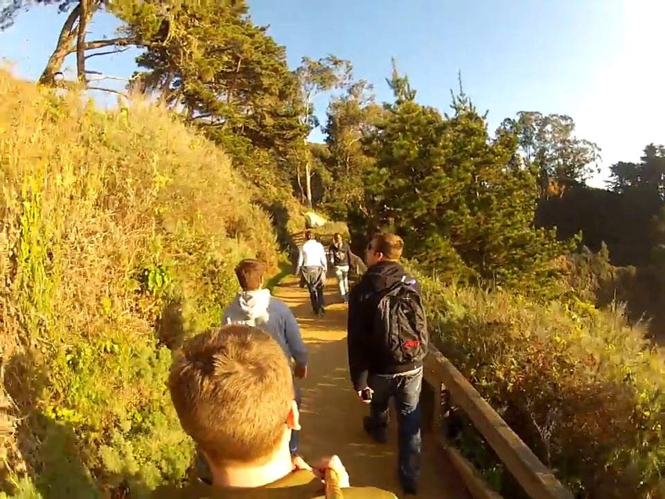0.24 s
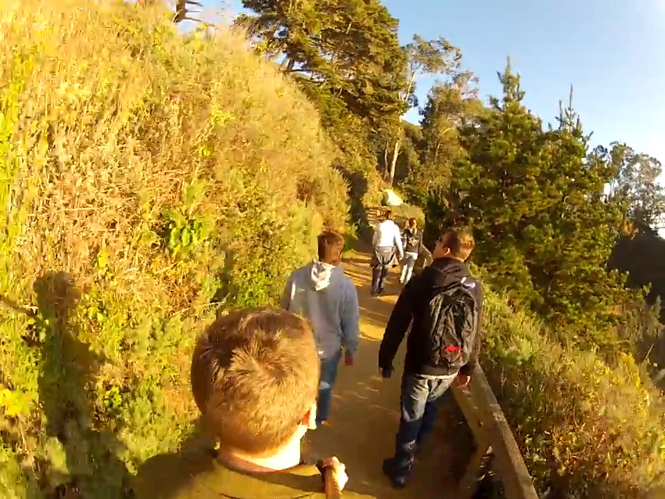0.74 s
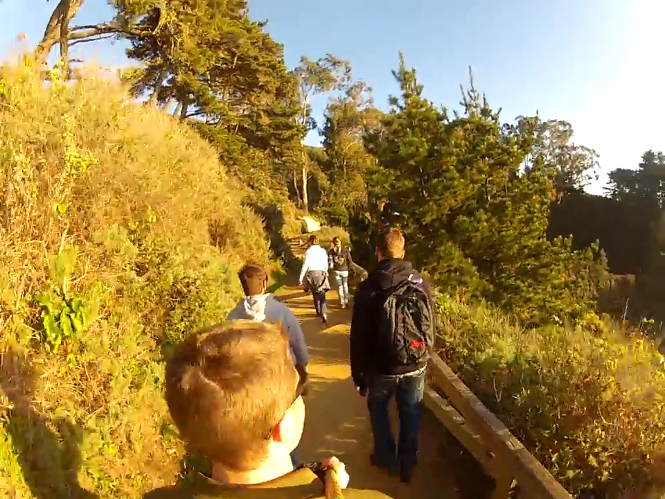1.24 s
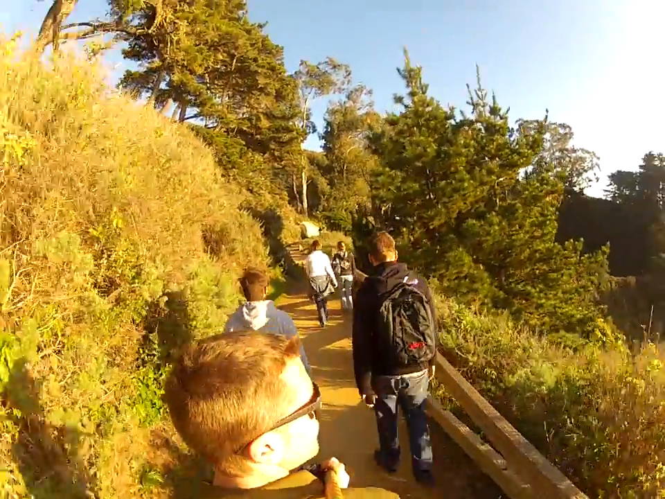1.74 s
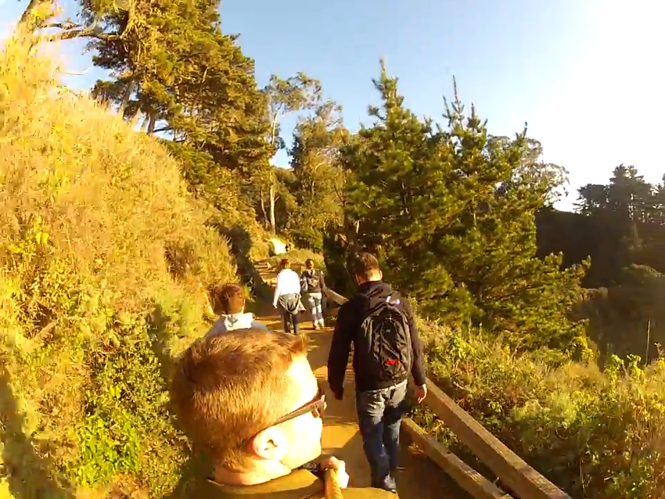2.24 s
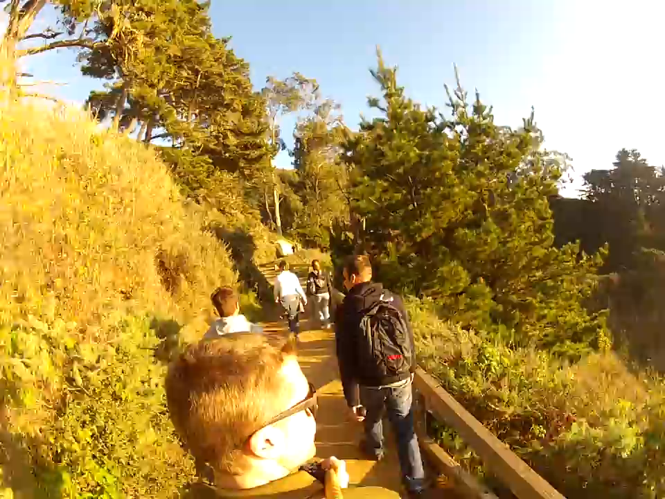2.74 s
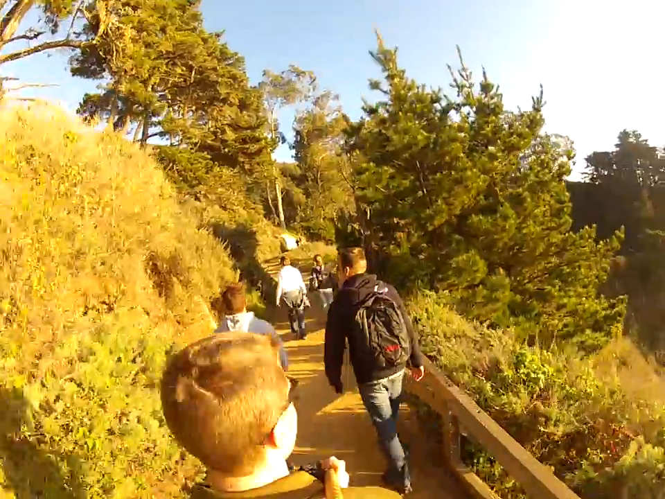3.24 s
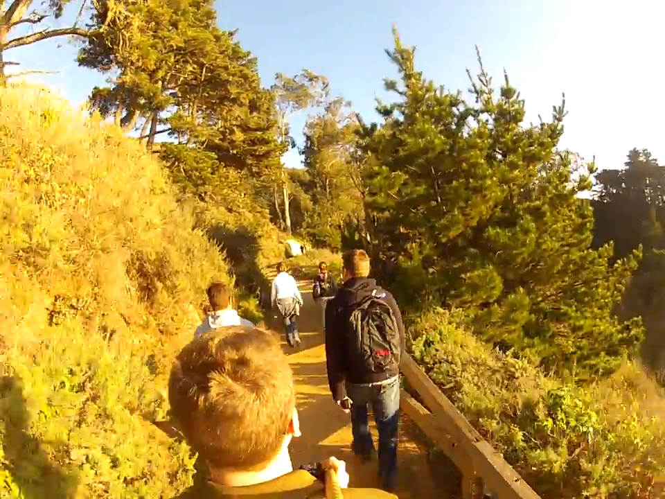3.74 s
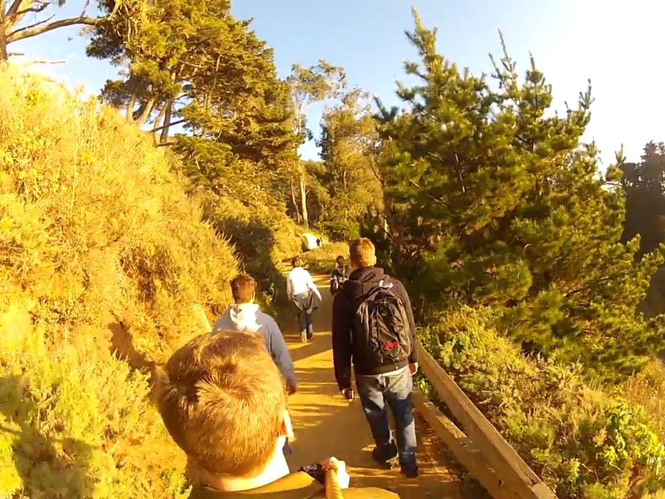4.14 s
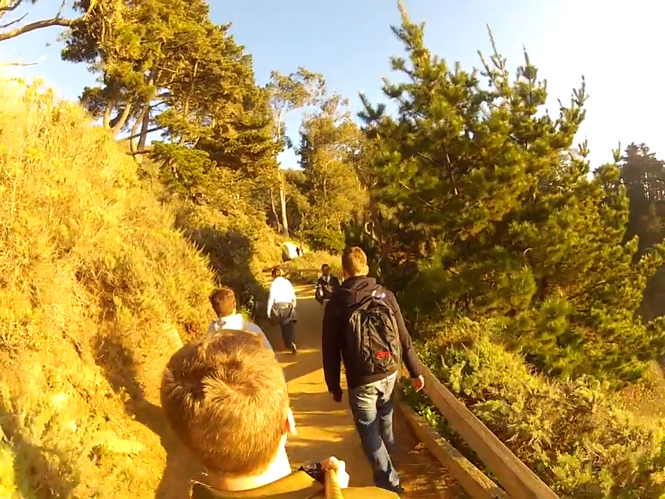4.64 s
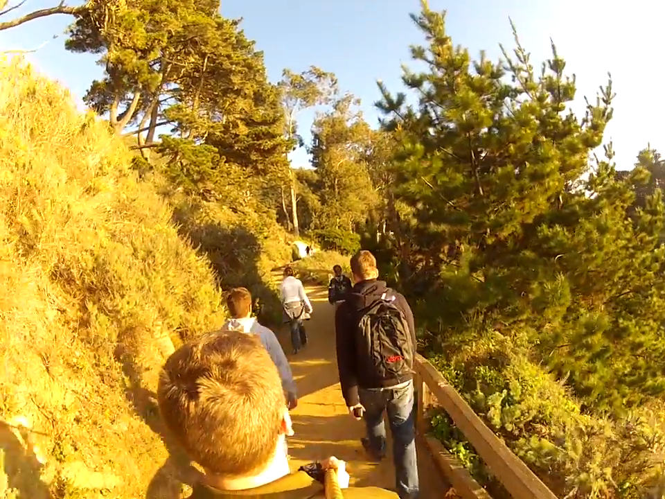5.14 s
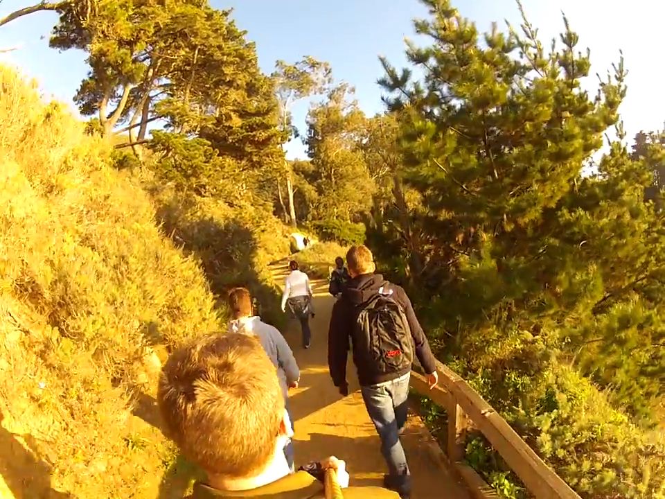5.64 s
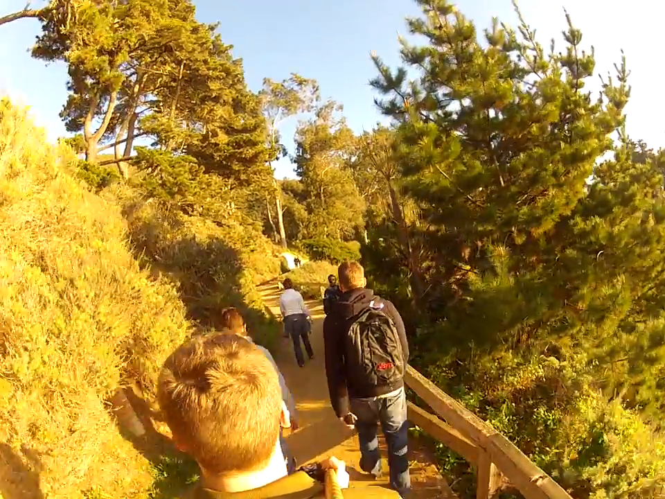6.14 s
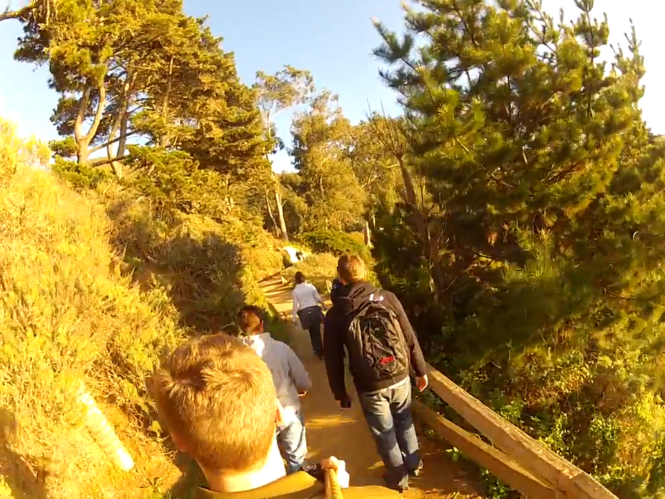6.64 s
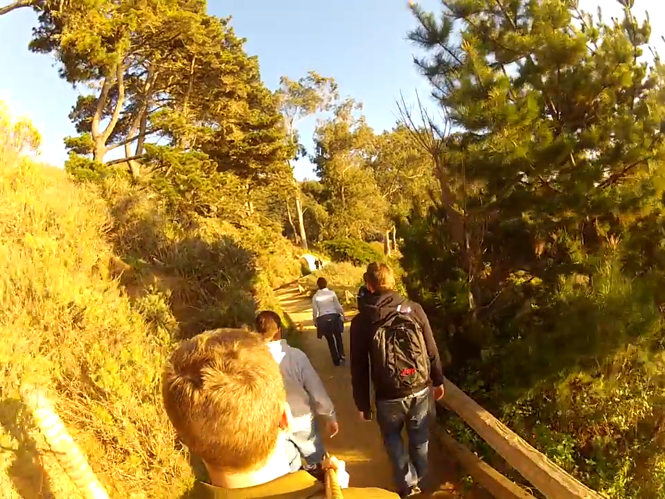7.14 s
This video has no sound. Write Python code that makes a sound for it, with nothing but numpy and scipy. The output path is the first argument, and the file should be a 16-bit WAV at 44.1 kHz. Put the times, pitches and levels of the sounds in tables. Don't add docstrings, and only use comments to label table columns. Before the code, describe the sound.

Heard from inside a small sealed housing on a carried pole: a busy opening of hollow plastic knocks, sharp slams, low palm thumps and dragging grip noise. Hardest blows come just before one second and again near two. After that it drops to quiet, uneven walking jolts, light ticks and gritty rubs at each stride, with a faint muffled hiss. Outdoor trail, but completely dry, lo-fi, with no room.

```python
import sys
import numpy as np
from scipy import signal
from scipy.io import wavfile
from scipy.ndimage import uniform_filter1d

SR = 44100
rng = np.random.default_rng(int(sys.argv[2]) if len(sys.argv) > 2 else 0)


def dump_mix(stems):
    frames = np.atleast_2d(stems).T
    limited = np.clip(frames, -1, 1)
    pcm = np.round(limited * 32767).astype(np.int16)
    wavfile.write(sys.argv[1], SR, pcm)


def voltage_ratio(level):
    return 10 ** (np.asarray(level, float) / 20)


N = 326781

# pitch_hz, width_hz, level_db
POLE_MODES = [(172.7, 67.5, -3.5), (216, 71, 0.5), (262.4, 16.3, 2.5), (350.7, 13.8, -14.5),
              (442, 85, -13.5), (597, 21, -15)]
HOLLOW_MODES = [(477, 44, -11.5), (751, 34.5, 4), (925, 132, 2), (1070, 260, -0.5), (1290, 16, -21)]
SHELL_MODES = [(1600, 78, -3), (1862, 135, -6.5), (2007, 104, -2), (2206, 84, 0.5), (2416, 140, -5.5),
               (2730, 79, -5)]
RIM_MODES = [(3100, 200, -4), (3286, 88, -5), (3584, 240, -1.5)]
# pitch_hz, width_hz, level_db
GRIPPED_POLE_MODES = [(179.4, 44.7, -5.5), (224, 34.7, -4), (255.8, 11.7, 1), (434.5, 13.7, -15),
                      (578.3, 20, -14.5)]
# pitch_hz, width_hz, level_db
KNOCKED_HOLLOW_MODES = [(768, 18, -1), (940, 37, -2), (978, 98, 4), (1205, 74, -5)]
KNOCKED_SHELL_MODES = [(1578, 81, -5), (1907, 76, -1.5), (2181, 73, 3), (2437, 96, -2), (2740, 214, -8.5)]
# pitch_hz, width_hz, level_db
SLAMMED_HOLLOW_MODES = [(438, 30, -4), (581, 32, -5), (750, 40, -14), (965, 60, 5), (1190, 100, -16.5)]
SLAMMED_SHELL_MODES = [(1590, 80, -7), (1950, 127, 1), (2200, 90, -1), (2453, 140, -6), (2670, 100, -11),
                       (2920, 150, -14)]
SLAMMED_RIM_MODES = [(3240, 115, -3), (3534, 110, 1), (3900, 200, -12)]
# pitch_hz, width_hz, level_db
TAPPED_SHELL_MODES = [(1600, 110, -10), (1910, 70, -8), (2165, 85, 1.5), (2385, 100, -1.5), (2700, 70, -11)]

# start_s, level_db, pole_db, hollow_db, contact_s
KNOCKS = [(.0014, -29, -10, -7, 0.011), (.0503, -32.5, 13.5, -7, 0.017), (.1385, -22, -11, -12, 0.006),
          (.222, -32, -8, -14, 0.008), (.3, -46, 4, 6, 0.029), (.352, -38, 0, -2, 0.015),
          (.5871, -32.5, -16, -2.5, 0.0069), (.7002, -32.5, 6, 3.5, 0.005), (.722, -36, -12, -8, 0.017),
          (.9956, -43, -5, -5, 0.0072), (1.016, -36, -5, -12, 0.0059), (1.1787, -47, -12, -1, .008),
          (1.2855, -47.5, 9, 3.5, 0.011), (1.585, -40.5, 6, -3, 0.01), (1.8098, -36.5, -20, -12.5, 0.01),
          (1.8452, -36.5, -4.5, -17, 0.0097), (1.862, -35, -19.5, -13, 0.0027), (2.041, -48, -5, 9, 0.009),
          (2.064, -53, -3, 0, 0.0064), (2.078, -53, -10, -8, 0.0043), (2.0951, -41.5, 16.5, 3.5, 0.011)]
# start_s, level_db, pole_db, hollow_db, contact_s
RIM_KNOCKS = [
    (0.5576, -36, 16, -4, 0.0084),
    (1.8754, -39, -3, 4, 0.0049),
]
# start_s, level_db, pole_db, hollow_db
THROWS = [(2.9763, -50, 8, 1), (3.5244, -42.5, -1, -6), (3.541, -50.5, 19, 9.5), (3.5752, -47.5, 15, 1.5),
          (3.677, -51, 11.5, 0), (3.7308, -40, -.4, -26), (4.062, -38, 4, 5), (4.121, -33, 5.5, -2.5),
          (4.1766, -37.5, 6.5, -19), (4.685, -40, 11.5, -13), (4.721, -40, 10, -20), (5.0301, -57, 16, -16),
          (5.2286, -39, 8.5, 3.5), (5.3119, -38.5, 4.5, -6), (5.776, -40, 3.5, 1),
          (5.8214, -44.5, 17.5, -7), (6.409, -36, 1, -1), (6.447, -37.5, 6, -11), (6.9661, -36.5, -1, -1.5),
          (7.0217, -44, 15, -10), (7.09, -40, -23, -14)]
# start_s, level_db, hollow_db, contact_s
TICKS = [(2.4578, -46.5, -5.5, .0091), (2.5705, -35, -34, 0.022), (2.605, -34.5, -13, 0.0085),
         (3.22, -44.5, 2, 0.0089), (3.844, -33, -3.5, 0.012), (3.8679, -35.5, -18, 0.013),
         (4.594, -45.5, -7, 0.007), (4.7716, -48, -11, 0.0066), (4.8, -45.5, -14, 0.0096),
         (4.9673, -33, -13, 0.0048), (6.024, -34, -12, 0.022), (6.149, -34, -7, 0.0076),
         (6.577, -44, -17, 0.0047), (6.6002, -31, -14.5, 0.019), (6.9897, -45, -6, 0.0049),
         (7.1793, -32.5, -18, 0.0076), (7.2475, -38, 0, 0.006), (7.2724, -33, -26, 0.009),
         (7.313, -37, -14, 0.0076)]
# start_s, level_db, hollow_db, contact_s
GRAINS = [(0.0871, -25, -9, 0.0089), (0.3769, -29.5, -18, 0.007), (0.4418, -38, -4, 0.006),
          (0.5341, -31, -6, 0.006), (1.3654, -50.5, -15, 0.0073), (1.4051, -44.5, -10, 0.0066),
          (1.4485, -39, -10, 0.006), (1.476, -41.5, -10, 0.0055), (1.5383, -40, -12, 0.005),
          (1.6194, -49, -12, 0.0055), (2.5425, -42, -11, 0.0055), (2.6952, -44, -10, 0.006),
          (3.8296, -46, -10, 0.0037), (4.0662, -44, -8, 0.006), (4.154, -42, -8, 0.006),
          (4.4148, -43, -10, 0.006), (4.4387, -37, -13, 0.0078), (4.6663, -45, -6, 0.0067),
          (4.8822, -45.5, -15, 0.0048), (4.8913, -40.5, -10, 0.0053), (4.9286, -42, -8, 0.0047),
          (4.9844, -49, -6, 0.0042), (5.009, -50, -8, 0.006), (5.199, -44, -1, 0.0067),
          (5.2464, -41, -1, 0.0055), (5.2749, -36, 2, 0.006), (5.5522, -45, -7, 0.006),
          (5.5632, -42.5, -9, 0.0067), (5.86, -38, -10, 0.0068), (6.0725, -41, -4, 0.0056),
          (6.1294, -36.5, -7.5, 0.006), (6.4382, -41, -10, 0.0068), (6.556, -46, -11, 0.004),
          (6.5884, -41, -14, 0.0039), (6.6114, -37, -10, 0.0047), (7.2209, -37.5, -6, 0.0068),
          (7.2914, -36, -16, 0.0041), (7.3416, -49, -15, 0.006), (4.386, -48, -4, .006),
          (4.555, -55, -8, .005), (5.4185, -48, -10, .005), (6.774, -50, -10, .005),
          (6.863, -52, -10, .005), (3.558, -46, -2, .006), (6.4145, -40, -12, .008)]
# start_s, level_db, pole_db, shell_db, rim_db
SLAMS = [
    (0.3271, -22, 3, -4, -14),
    (0.7445, -22, -3, -6, -20.5),
    (0.8179, -29, -20, -4.5, -19),
    (0.8913, -16.5, 10.5, -2.5, -12.5),
    (0.9529, -26.5, -8, -0.5, -3),
    (1.9081, -17, 4, -1.5, -10.5),
    (1.9423, -23.5, -1.5, -4.5, -15),
    (2.006, -23, 3.5, -4, -12),
]
# start_s, level_db, pole_db, shell_db, rim_db
REBOUNDS = [
    (1.9112, -23, -10, -8, -12),
    (1.9444, -25, -10, -7, -16),
    (2.0081, -30, -10, -6, -14),
]
# start_s, level_db, pole_db, shell_db, rim_db
TAPS = [
    (.1333, -26.5, 4, 13, -7),
    (.2186, -36, -1, 13, -8),
    (2.5707, -56, 0, 18, 0),
    (6.0203, -46, -5, 11, -8),
    (6.5717, -50, -5, 13, -5),
    (7.1797, -50, -5, 14, -5),
]
# swing_s, level_db, length_s
JOLTS = [(0.3715, -13, 0.024), (.597, -23, .016), (.707, -23, .011), (.742, -19, .018), (.897, -17, .016),
         (4.141, -31, .022), (7.012, -30, .04), (3.62, -37, .03), (6.425, -33, .014), (.68, -35, .008),
         (1.241, -31, 0.017), (1.326, -29, 0.024), (1.597, -30, 0.016), (3.53, -37.5, 0.01),
         (3.548, -47, 0.007), (3.562, -26, 0.0072), (3.578, -27, 0.0073), (4.127, -25, 0.008),
         (4.1815, -28, 0.009), (4.778, -31, 0.0065), (5.28, -22.5, 0.0098), (5.302, -24, 0.017),
         (5.316, -24.5, 0.0067), (5.785, -29, 0.011), (6.4145, -24, 0.008), (6.971, -40, 0.0079),
         (6.994, -32, 0.0071), (7.036, -37, 0.014), (2.445, -32, 0.033), (3.047, -36, .025)]
# start_s, level_db, pitch_hz, fade_20db_s
THUMPS = [(.3545, -18, 240, .03), (.351, -27, 1195, .025), (.7462, -8, 220, .02), (.3, -36, 1010, .025),
          (.442, -33, 950, .03), (.403, -38, 965, .03), (.7, -37, 760, .025), (4.062, -39, 1000, .02),
          (5.82, -41, 1020, .04), (3.677, -34, 130, .03), (7.248, -35, 1060, .015), (3.529, -37, 190, .03),
          (4.692, -36, 215, .04), (4.721, -30, 215, .04), (5.03, -43, 250, .06), (5.856, -43, 750, .05),
          (5.895, -44, 750, .04), (6.452, -42, 750, .015), (5.8175, -29, 200, .05), (5.889, -31, 120, .05),
          (6.409, -30, 200, .03), (7.0285, -28, 230, .02)]
# start_s, level_db
FLICKS = [(0.053, -21), (.073, -20), (.088, -18), (0.096, -19), (.1025, -24), (.1395, -19), (.152, -27),
          (.222, -32), (.82, -33), (.308, -26.5), (2.041, -27.5), (1.962, -33), (3.849, -47.5),
          (4.153, -31), (4.943, -45), (5.863, -31), (6.126, -41), (6.44, -29.5), (7.25, -36.5)]
# peak_s, level_db, pitch_hz, fade_20db_s
SWINGS = [(0.0, -36, 31.6, 1.2), (.385, -28.5, 35.1, .17), (.61, -29, 35.9, .05), (.775, -23, 31.5, .3),
          (.91, -27, 32, .15), (1.25, -41, 34, .3), (1.935, -21, 33.5, .24), (2.05, -27, 33, .1),
          (2.2, -49, 31.3, .4), (2.45, -45, 31, .4), (3.07, -41, 29.5, .15), (3.3, -51, 27.5, .5),
          (3.53, -48, 27.8, .25), (4.15, -38, 30.4, .3), (4.45, -49, 33, .4), (4.64, -47, 32.9, .2),
          (5.32, -37.5, 32.5, .25), (5.9, -43, 32.9, .4), (6.48, -33.5, 24, .16), (6.69, -52, 32.6, .4),
          (7.0, -37, 29.3, .08), (7.09, -42, 26, .3), (7.4, -52, 28, .2)]
# peak_s, level_db, hollow_db, rise_20db_s, fade_20db_s
GRIP_RUBS = [(.092, -38, -3, .08, .05), (.19, -50, -9, .06, .05), (.245, -43, -12, .04, .08),
             (.295, -40, -10, .07, .05), (.35, -40, -3, .04, .04), (.4, -42, -8, .06, .07),
             (.45, -43, -3, .05, .03), (.535, -44, -4, .08, .06), (.595, -44, -7, .06, .04),
             (.66, -59, -6, .08, .06), (.73, -43, -8, .05, .11), (.83, -53, -8, .04, .06),
             (.915, -52, -2, .02, .05), (1.0, -48, -4, .06, .045), (1.19, -57, 0, .04, .05),
             (1.315, -51, -6, .045, .085), (1.46, -58, -9, .09, .045), (1.57, -47, -5, .07, .08),
             (1.86, -53, -7, .08, .05), (1.93, -55, -8, .03, .06), (1.965, -55, -2, .03, .06),
             (2.03, -57, 0, .035, .11)]
# peak_s, level_db, hollow_db, rise_20db_s, fade_20db_s
STRIDE_RUBS = [(2.42, -66, -3, .4, .2), (2.585, -52, -10, .06, .05), (2.7, -56, -5, .09, .11),
               (3.0, -69, -6, .3, .3), (3.235, -50, -7, .03, .13), (3.535, -58, -3, .02, .09),
               (3.745, -54, -5, .03, .12), (3.81, -55, -3, .1, .1), (3.85, -55, 5, .06, .05),
               (4.08, -51.5, 1, .05, .16), (4.3, -66, -5, .2, .2), (4.43, -52, -6, .08, .06),
               (4.7, -52, 0, .07, .09), (4.94, -50, -4, .12, .11), (5.245, -49, 3, .06, .06),
               (5.287, -49, 0, .05, .025), (5.55, -54, -4, .15, .09), (5.795, -53, 2, .03, .17),
               (6.035, -51, -5, .02, .08), (6.1, -49, -7, .1, .08), (6.3, -61, -3, .03, .04),
               (6.43, -55, 1, .1, .05), (6.59, -60, -3, .08, .08), (6.69, -50.5, -4, .09, .12),
               (6.98, -61, 0, .03, .12), (7.195, -52, -9, .015, .12), (7.26, -49, -3, .09, .125)]
# peak_s, thud_db, rumble_db, rise_20db_s, fade_20db_s
BUMPS = [(.056, -34, -34, .012, .2), (.09, -32, -36, .05, .05), (.36, -33, -22, .05, .06),
         (.47, -42, -44, .2, .25), (.568, -33, -35, .015, .06), (.71, -46, -36, .08, .1),
         (.752, -31, -26, .012, .03), (.9, -25, -28, .006, .09), (1.32, -45, -47, .14, .06),
         (1.59, -54, -53, .1, .28), (1.914, -31, -37, .008, .2), (2.1, -41, -56, .03, .08)]
# peak_s, thud_db, rumble_db, rise_20db_s, fade_20db_s
HEELS = [(2.68, -61.5, -50, 0.35, .4), (2.99, -58, -48, 0.86, 0.24), (3.26, -49.5, -43, 0.07, 0.22),
         (3.543, -42.5, -39.5, 0.07, -0.02), (3.76, -56.5, -48.5, 0.4, 0.46),
         (4.065, -37.5, -32, -0.02, 0.08), (4.14, -44, -37, 0.09, 0.04), (4.46, -59.5, -51, 0.4, 0.3),
         (4.702, -35.5, -38.5, -0.06, 0.01), (4.97, -50.5, -42.5, 0.22, 0.17),
         (5.24, -40, -35.5, 0.05, 0.1), (5.279, -35, -44, 0.06, 0.06), (5.57, -44, -41, 0.13, .09),
         (5.78, -52, -40.5, 0.07, 0), (5.84, -32.5, -44, -0.07, -0.01), (5.9, -40.5, -36.5, 0.09, -0.29),
         (6.15, -55.5, -41.5, 0.3, 0.3), (6.419, -30, -33, 0.01, 0.0155), (6.75, -54.5, -48.5, 0.16, 0),
         (6.97, -48.5, -43.5, 0.12, 0.4), (7.26, -48, -40.5, -0.08, 0.2)]
# pitch_hz, level_db (per Hz)
HISS_COLOUR = [(20, -29), (40, -10), (134, -19.5), (257, -30.5), (320, -19), (500, -28.5), (960, -36),
               (1400, -33.5), (2200, -29), (3000, -34.5), (3600, -36), (4200, -44)]


def evened(x):
    return x / np.sqrt(np.mean(x ** 2) + 1e-20)


def add(mix, start_s, sound):
    part = mix[max(round(start_s * SR), 0):][:len(sound)]
    part += sound[:len(part)]


def ring(force, modes):
    t = np.arange(SR // 4) / SR
    body = np.zeros(len(t))
    for k, (hz, width_hz, db) in enumerate(modes):
        decay = np.exp(-np.pi * width_hz * t)
        body += (-1) ** k * voltage_ratio(db) * width_hz * decay * np.sin(2 * np.pi * hz * t)
    return signal.oaconvolve(force, body / np.linalg.norm(body))[:len(force)]


def push():
    t = np.arange(400) / SR
    return t / 0.00079 * np.exp(-t / 0.00055)


def drift(size):
    smooth = uniform_filter1d(rng.standard_normal(N), size=size)
    return evened(uniform_filter1d(smooth, size=size))


def slips(per_s, spread_db, smooth):
    sizes = voltage_ratio(spread_db * np.minimum(rng.exponential(1, N), 3.5))
    kicks = sizes * (rng.random(N) < per_s / SR)
    kicks *= rng.choice([-1., 1.], N)
    return evened(evened(kicks) + smooth * rng.standard_normal(N))


def swells(peak_s, db, rise_s, fade_s, rest_db, bend=1):
    t = np.arange(0, N + 64, 64) / SR
    after = t[:, None] - peak_s
    rising = -after / np.maximum(rise_s, .005)
    fading = after / np.maximum(fade_s, .005)
    level_db = db - 20 * np.where(after < 0, rising, fading) ** bend
    gain = np.sqrt((voltage_ratio(level_db) ** 2).sum(axis=1) + voltage_ratio(rest_db) ** 2)
    return np.interp(np.arange(N) / SR, t, gain)


def knocks(hits):
    shell, hollow, rim, pole = np.zeros((4, N))
    t = np.arange(1800) / SR
    first = 3.96 * (t == 0)
    for hit in hits:
        start_s, db, pole_db, hollow_db, contact_s = hit
        rim_db = -10 if hit in RIM_KNOCKS else -26
        chatter = rng.standard_normal(len(t))
        contact = (first + chatter) * np.exp(-3 * (t / max(contact_s, .001)) ** 2)
        start_s = start_s - .0006
        add(shell, start_s, voltage_ratio(db - 5.5) * contact)
        add(hollow, start_s, voltage_ratio(db + hollow_db - 3.5) * contact)
        add(rim, start_s, voltage_ratio(db + rim_db) * contact)
        add(pole, start_s, voltage_ratio(db + pole_db + 2) * push())
    housing = ring(shell, KNOCKED_SHELL_MODES) + ring(hollow, KNOCKED_HOLLOW_MODES)
    return housing + ring(rim, RIM_MODES) + ring(pole, POLE_MODES)


def on_shell(ticks):
    return [(s, db, -15, hollow_db, contact_s) for s, db, hollow_db, contact_s in ticks]


def loose_mount():
    thrown = [(*throw, .008) for throw in THROWS]
    return knocks(sorted(KNOCKS + on_shell(TICKS) + thrown + RIM_KNOCKS))


def slams(blows, shell_modes):
    hollow, shell, rim, pole = np.zeros((4, N))
    t = np.arange(900) / SR
    for start_s, db, pole_db, shell_db, rim_db in blows:
        chatter = 0.091 * rng.standard_normal(len(t)) * np.exp(-t / 0.0055)
        contact = voltage_ratio(18.5) * ((t == 0) + chatter)
        add(hollow, start_s, voltage_ratio(db) * contact)
        add(shell, start_s, voltage_ratio(db + shell_db) * contact)
        add(rim, start_s, voltage_ratio(db + rim_db) * contact)
        add(pole, start_s, voltage_ratio(db + pole_db) * push())
    housing = ring(hollow, SLAMMED_HOLLOW_MODES) + ring(shell, shell_modes)
    return housing + ring(rim, SLAMMED_RIM_MODES) + ring(pole, POLE_MODES)


def jolts():
    out = np.zeros(N)
    t = np.arange(-2000, 2000) / SR
    for swing_s, db, length_s in JOLTS:
        u = t / length_s
        add(out, swing_s + t[0], voltage_ratio(db) * (12 * u ** 2 - 1) * np.exp(-9 * u ** 2))
    return out


def thumps():
    out = np.zeros(N)
    t = np.arange(5000) / SR
    onset = 1 - np.exp(-t / .0015)
    for start_s, db, hz, fade_s in THUMPS:
        add(out, start_s, voltage_ratio(db - 20 * t / fade_s) * onset * np.sin(2 * np.pi * hz * t))
    return out


def flicks():
    force = np.zeros(N)
    for start_s, db in FLICKS:
        add(force, start_s, voltage_ratio(db + 2.5) * push())
    return ring(force, GRIPPED_POLE_MODES)


def sway():
    peak_s, db, hz, fade_s = np.transpose(SWINGS)
    turns = np.cumsum(np.interp(np.arange(N) / SR, peak_s, hz)) / SR
    wobble = voltage_ratio(2.2 * drift(2500))
    gain = swells(peak_s, db, rise_s=.045, fade_s=fade_s, rest_db=-60, bend=1.4)
    return np.sqrt(2) * wobble * gain * np.sin(2 * np.pi * turns)


def rubbing():
    peak_s, db, hollow_db, rise_s, fade_s = np.transpose(GRIP_RUBS + STRIDE_RUBS)
    clumps = voltage_ratio(2.1 * drift(300))
    shell_grit = slips(per_s=3000, spread_db=3.5, smooth=.45)
    hollow_grit = slips(per_s=3000, spread_db=3.5, smooth=.45)
    rub = clumps * swells(peak_s, db, rise_s, fade_s, rest_db=-72, bend=1.7) * shell_grit
    boom_gain = clumps * swells(peak_s, db + hollow_db, rise_s, fade_s, rest_db=-73, bend=1.7)
    boom = boom_gain * (0.56 * shell_grit + 0.84 * hollow_grit)
    return ring(rub, SHELL_MODES) + voltage_ratio(-13) * ring(rub, RIM_MODES) + ring(boom, HOLLOW_MODES)


def tread():
    peak_s, thud_db, rumble_db, rise_s, fade_s = np.transpose(BUMPS + HEELS)
    thud = swells(peak_s, thud_db, rise_s, fade_s, rest_db=-72.5)
    thud = thud * slips(per_s=140, spread_db=4.5, smooth=0.38)
    rumble = swells(peak_s, rumble_db, rise_s, fade_s, rest_db=-70)
    rumble = rumble * slips(per_s=140, spread_db=-2.5, smooth=0.51)
    low_modes = [(67.2, 42, 0.62), (100.6, 31.0, -2.0)]  # pitch_hz, width_hz, level_db
    return ring(thud, GRIPPED_POLE_MODES) + ring(rumble, low_modes)


def hiss():
    hz = np.fft.rfftfreq(1024, 1 / SR)
    real, imag, patches = rng.standard_normal((N // 256 + 5, 513, 3)).T
    patches = uniform_filter1d(patches, size=8, axis=0)
    patches = evened(uniform_filter1d(patches, size=10, axis=1))
    colour_hz, colour_db = np.transpose(HISS_COLOUR)
    level_db = np.interp(np.log(hz + 1), np.log(colour_hz + 1), colour_db)
    spectrum = (real + 1j * imag) * voltage_ratio(level_db[:, None] + 2.2 * patches)
    noise = signal.istft(spectrum, nperseg=1024, noverlap=768)[1][:N]
    return voltage_ratio(-62) * evened(noise)


def scene():
    walk = tread() + voltage_ratio(-0.8) * rubbing() + loose_mount() + jolts() + hiss() + sway()
    blows = slams(SLAMS, SLAMMED_SHELL_MODES)
    handling = knocks(on_shell(GRAINS)) + flicks() + thumps()
    taps = slams(TAPS, TAPPED_SHELL_MODES)
    bounces = slams(REBOUNDS, SLAMMED_SHELL_MODES)
    return (walk + blows + handling + taps + bounces)[None]


def roll_off(x):
    return signal.sosfilt(signal.butter(12, 16510, fs=SR, output="sos"), x)


def record(dry):
    coarse_hz, hold = 8000, 4
    coarse = signal.resample_poly(dry, coarse_hz, SR, axis=1)
    held = np.repeat(coarse, hold, axis=1)
    full = signal.resample_poly(held, SR, hold * coarse_hz, axis=1)[:, :N]
    limited = signal.oaconvolve(full, signal.firwin(81, 15400, fs=SR)[None], "same")
    return roll_off(limited)


dry = scene()
out = record(dry)
dump_mix(out)
```